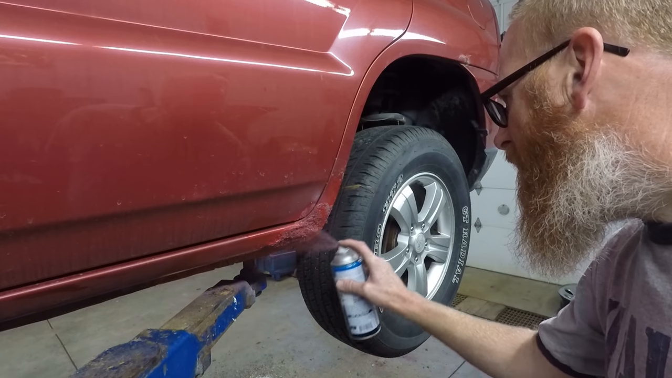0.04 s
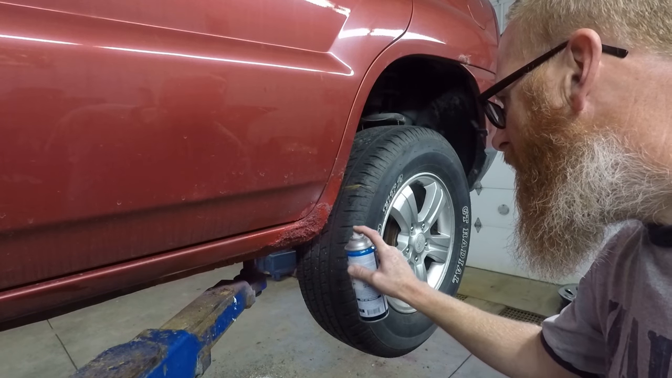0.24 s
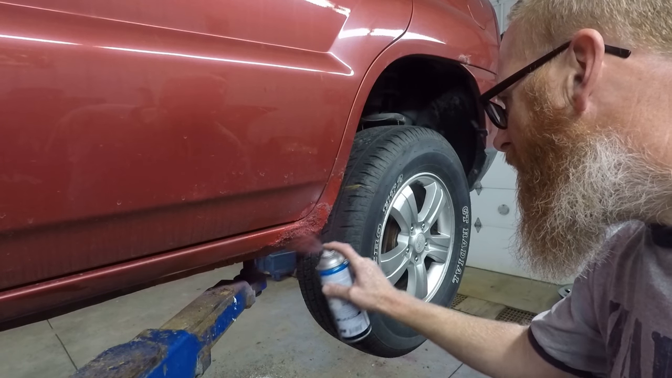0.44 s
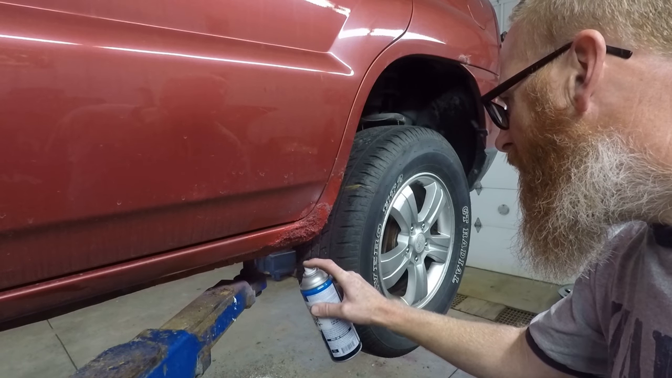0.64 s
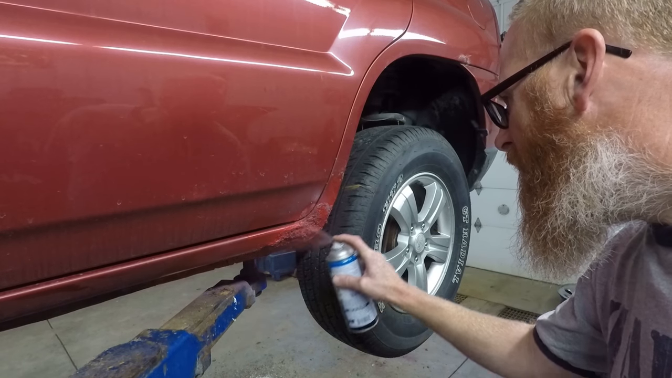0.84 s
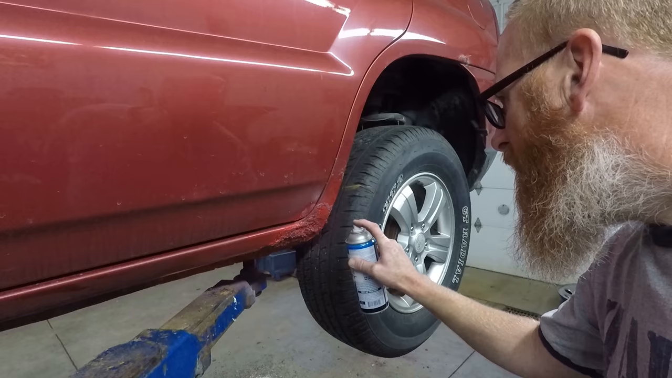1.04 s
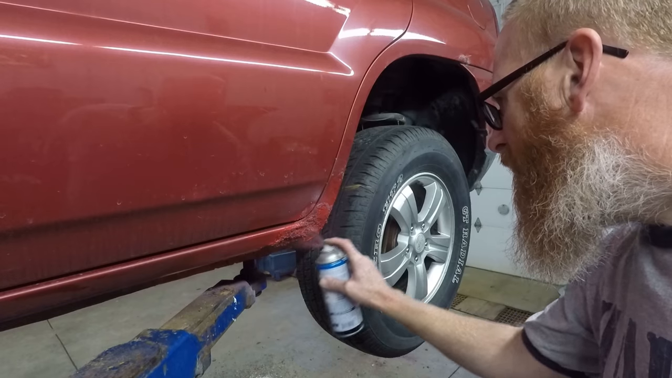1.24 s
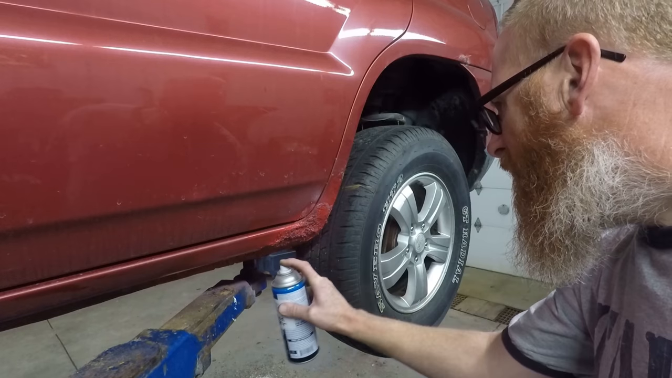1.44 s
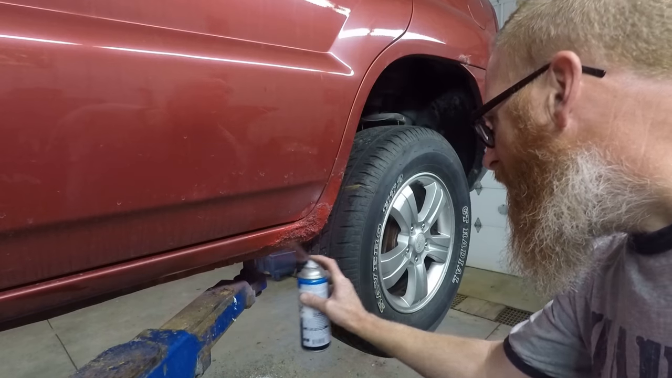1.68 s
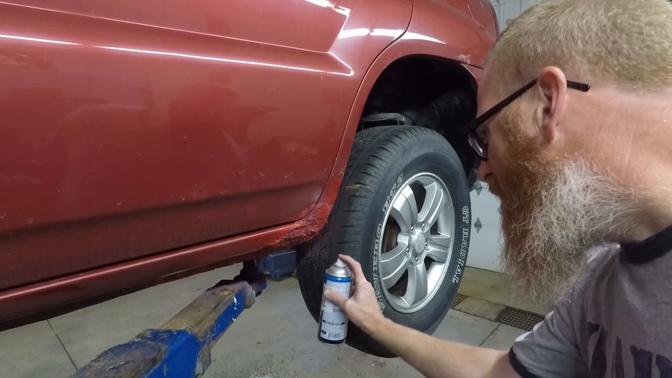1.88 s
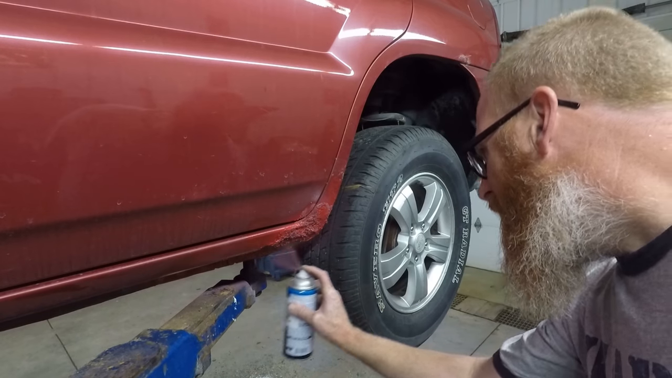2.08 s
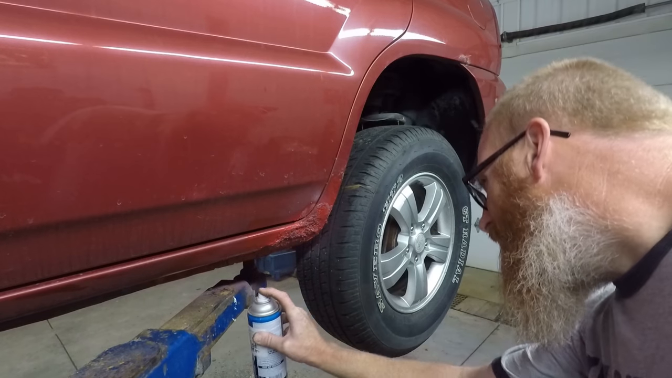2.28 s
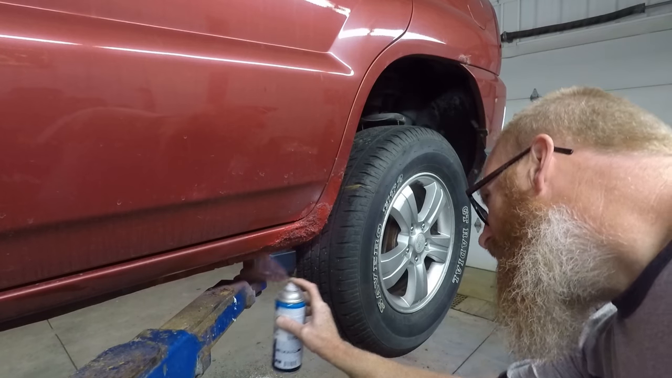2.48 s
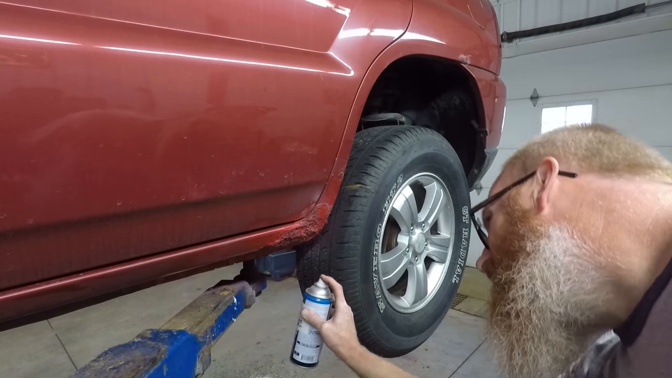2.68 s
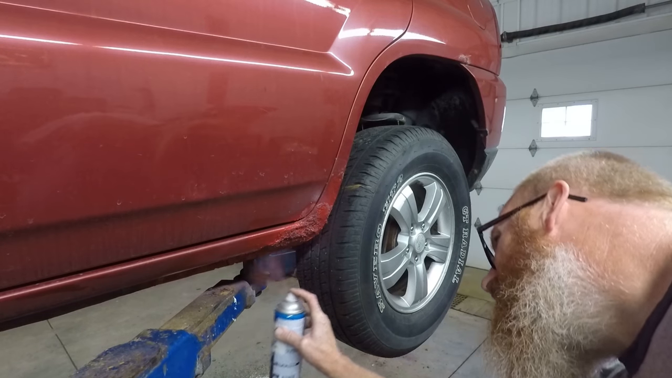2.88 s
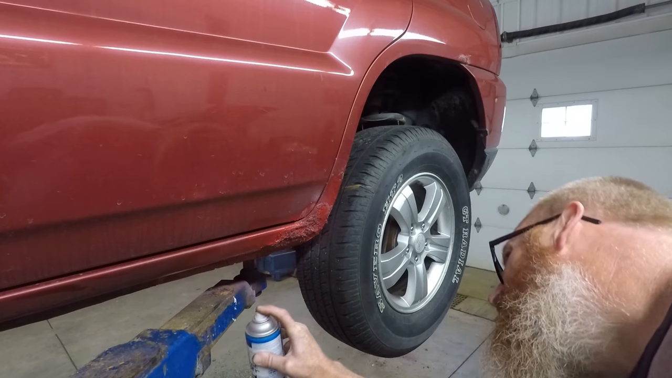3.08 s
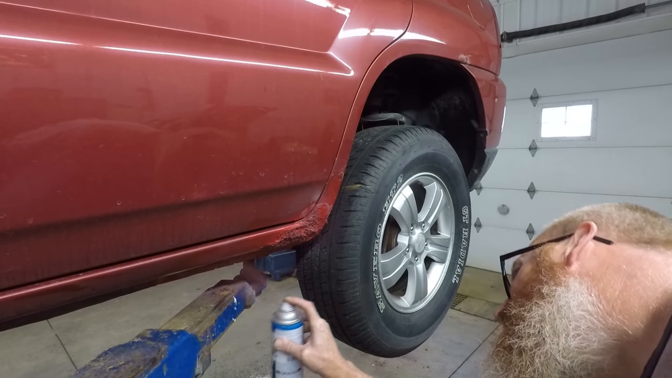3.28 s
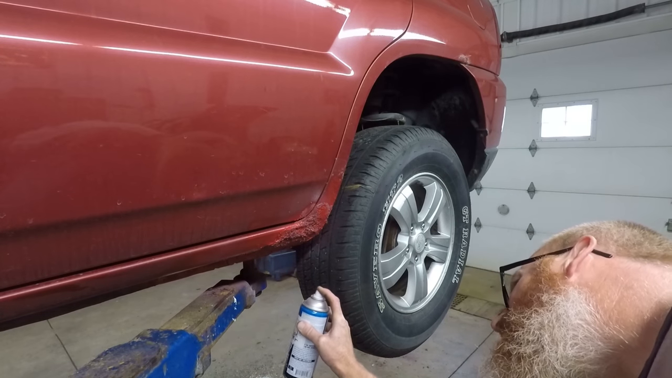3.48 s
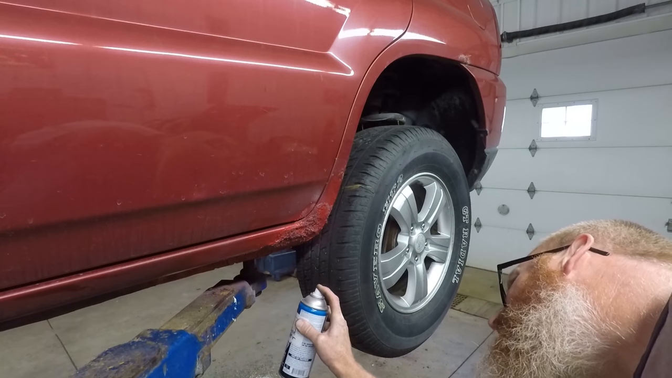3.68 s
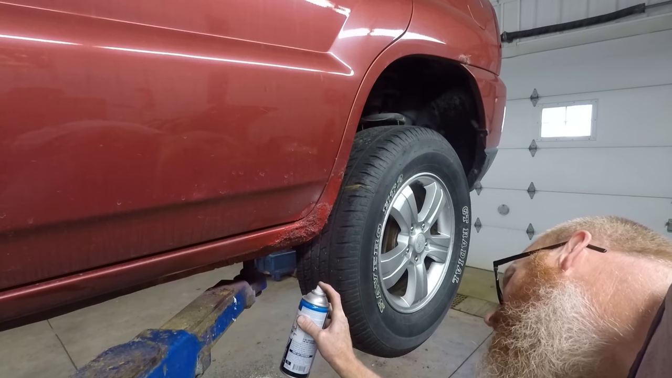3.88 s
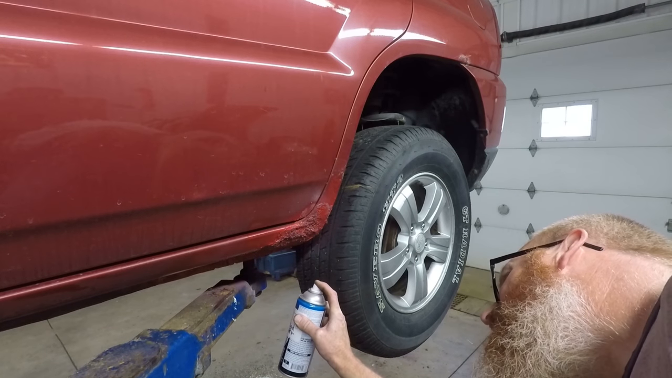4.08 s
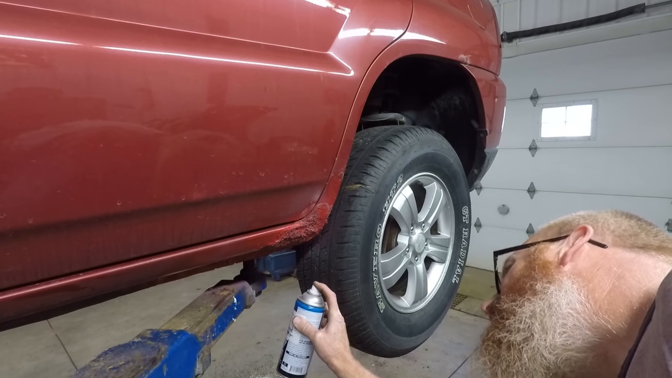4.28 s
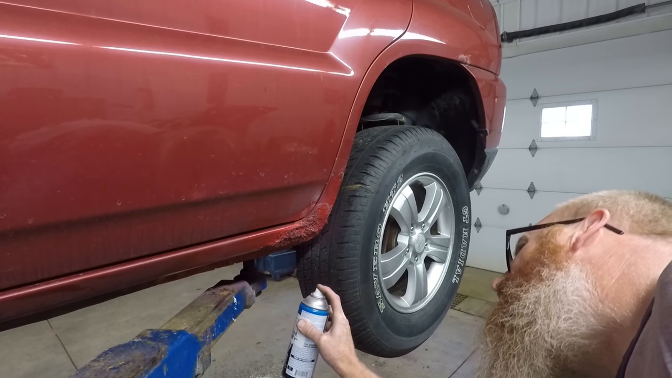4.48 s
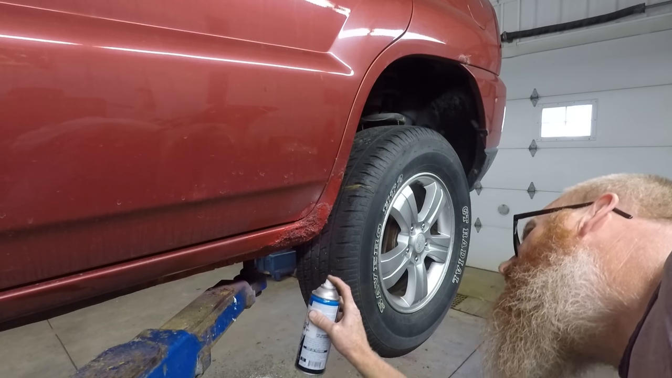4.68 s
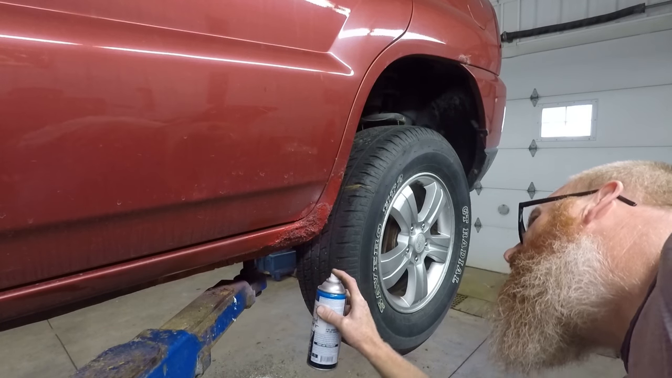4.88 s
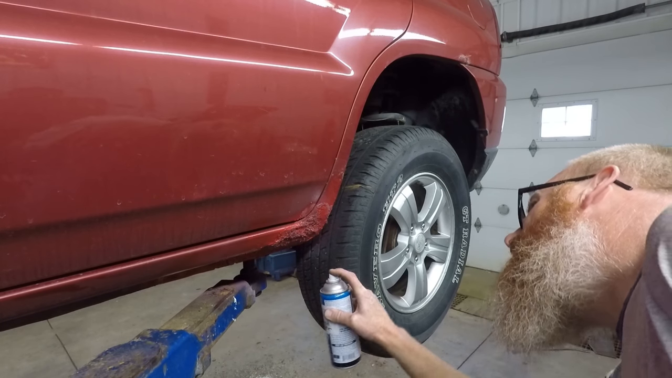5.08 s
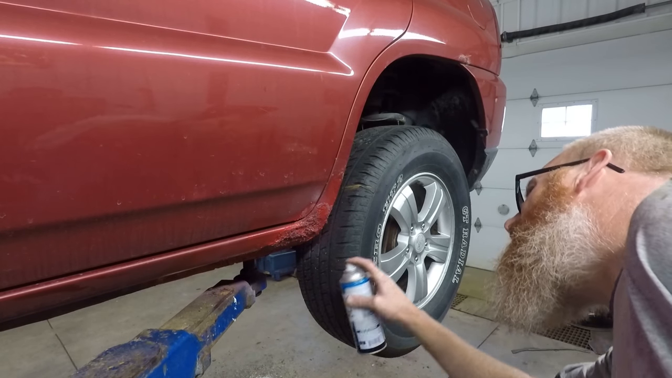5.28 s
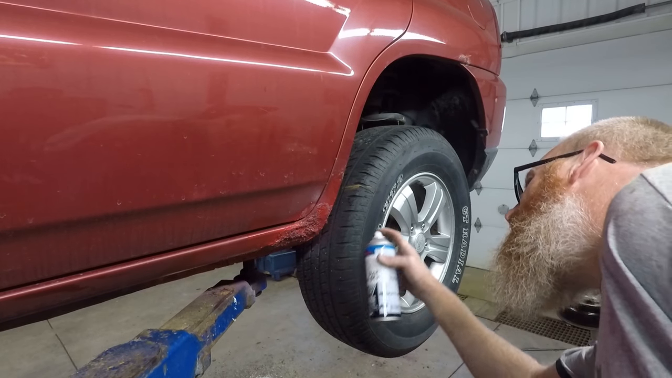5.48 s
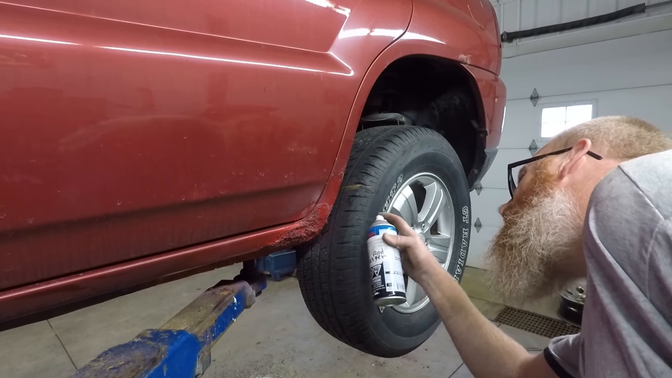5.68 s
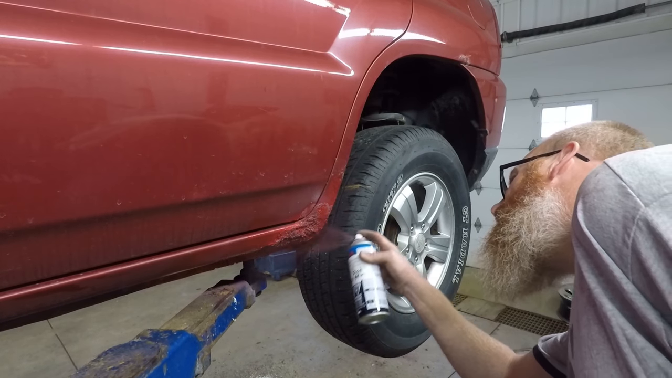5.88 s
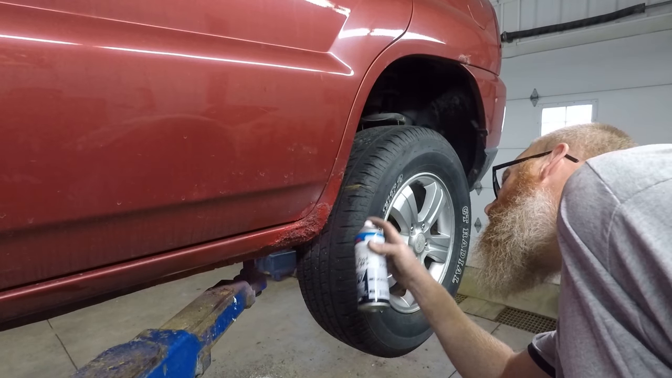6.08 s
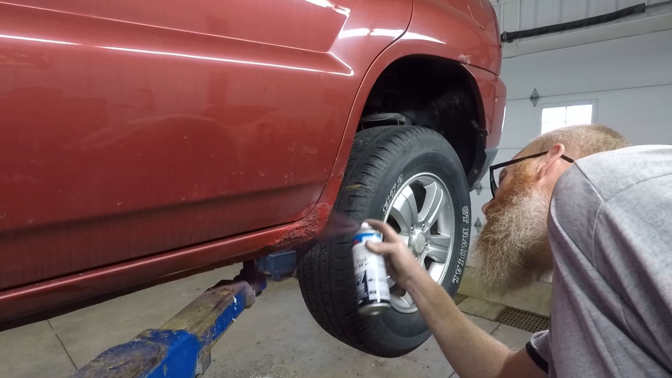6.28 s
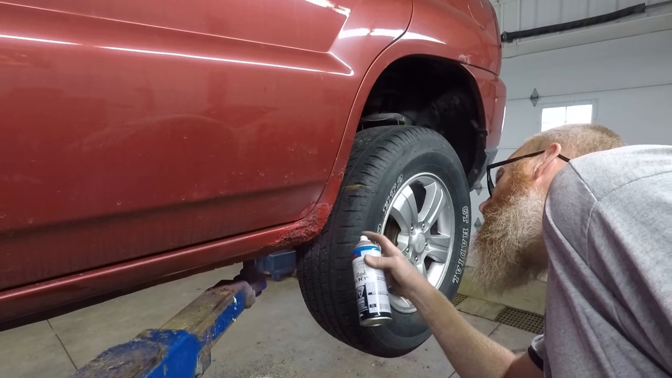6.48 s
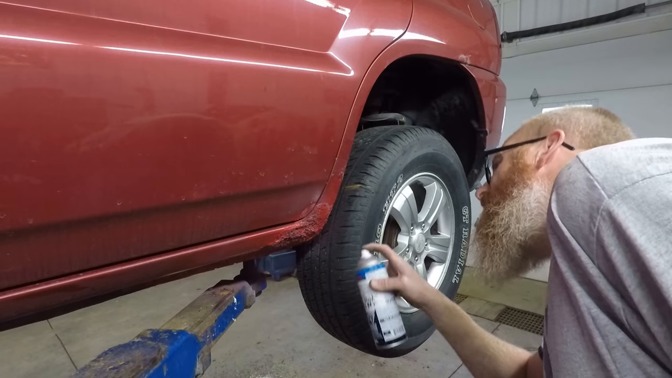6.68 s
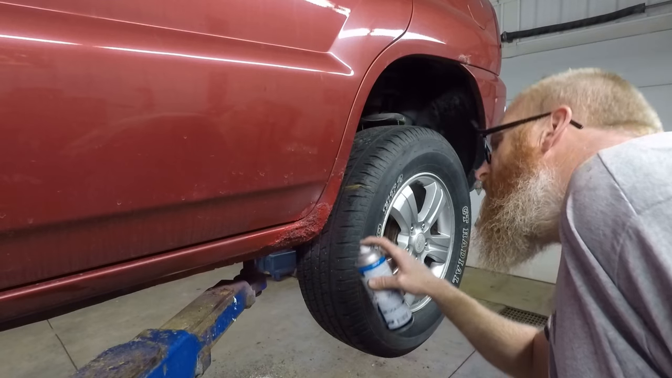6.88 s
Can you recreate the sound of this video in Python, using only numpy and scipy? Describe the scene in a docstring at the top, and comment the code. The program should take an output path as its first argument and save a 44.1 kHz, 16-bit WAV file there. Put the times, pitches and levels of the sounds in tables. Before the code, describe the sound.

Close to the microphone, a spray can gives nine crisp hissing bursts of about a fifth of a second each, nearly two and a half per second. Spraying stops for about two and a half seconds, leaving small dry ticks and a faint low drone, then two softer bursts follow and a few last clicks. The garage adds a short bright reverberation.

```python
"""An aerosol can sprays paint on a car's sill in eleven quick bursts, in a garage.
The jet is shaped turbulence noise, with spits from random pops as paint breaks up at the nozzle.
Delayed copies off the nearby panel and tyre comb the hiss, and the notches slide as the hand moves.
The can ticks between bursts and after the last: decaying noise through single resonances.
Far off an engine drones, a few harmonic orders slowly sinking in pitch over rumble and faint hiss."""
import sys
import numpy as np
from scipy import signal
from scipy.fft import rfft, irfft, next_fast_len
from scipy.io import wavfile
from scipy.ndimage import map_coordinates

SR = 44100
rng = np.random.default_rng(int(sys.argv[2]) if len(sys.argv) > 2 else 0)


def put_to_file(sound):
    """Save the sound as 16-bit audio at rate SR, in the file named by the first command-line argument."""
    columns = np.atleast_2d(sound).T  # one column per channel
    safe = np.clip(columns, -1, 1)
    whole_steps = np.round(safe * 32767)
    wavfile.write(sys.argv[1], SR, whole_steps.astype(np.int16))


N = 306054
T = np.arange(N) / SR  # s

# Levels in the tables are nominal, ahead of modulation and mixing gains.
# Garage background: [t/s, rumble level/dB, hiss level/dB]
BACKGROUND_LEVELS = [(0, -71, -70), (.66, -70.5, -68), (2.1, -64, -68.5), (2.9, -68, -69),
                     (3.9, -65, -71.5), (5.2, -70, -72.5), (6.94, -72, -70)]
# Spectral density of rumble and of hiss: [f/Hz, relative level/dB]
RUMBLE_SPECTRUM = [(15, -6), (28, 8.5), (45, 0), (80, 4.5), (130, 0), (190, -2.5), (250, -9.5),
                   (350, -10.5), (700, -24), (2000, -69)]
HISS_SPECTRUM = [(150, -55), (300, -8.5), (450, -6.5), (700, -6), (1250, -7), (1900, -10), (2900, -7.5),
                 (4200, -10), (5800, -15), (8300, -15.5), (10000, -11), (11500, -17), (13000, -18.5),
                 (15400, -20)]

# Far engine: [t/s, mean cycle rate f/Hz]
ENGINE_RATE = [(0, 13.15), (1, 12.7), (2, 12.25), (3, 11.85), (4, 11.62), (5, 11.48), (6.94, 11.38)]
# Orders (multiples of the cycle rate) that fade in and out: [t/s, level/dB]
FIFTH_ORDER_LEVEL = [(0, -59.5), (.7, -57.5), (1.9, -58), (2.14, -71), (2.35, -61.5), (3.05, -53.5),
                     (3.25, -59.5), (4.35, -64), (4.8, -53.5), (5.3, -67.5), (5.85, -63), (6.05, -57.5),
                     (6.94, -60)]
EIGHTH_ORDER_LEVEL = [(0, -72), (.8, -77), (1.78, -50.5), (2.1, -65.5), (2.4, -56), (3.95, -66),
                      (4.12, -54), (4.4, -53), (5.3, -64), (5.9, -67.5), (6.25, -57), (6.94, -53)]
ELEVENTH_ORDER_LEVEL = [(0, -80), (1.5, -80), (2, -64.5), (3.5, -62), (4.85, -77), (5.5, -62.5),
                        (6.1, -74.5), (6.94, -72)]
# The 15th and 17th orders swell once: dB, dB, s, s
UPPER_DB, UPPER_SWELL_DB, UPPER_AT_S, UPPER_WIDTH_S = -84, 13, 1.92, 1.1

# Decay of the garage's reverberation: [f/Hz, t60/s]
ROOM_DECAY = [(200, 0.87), (800, 0.26), (2050, 0.64), (2320, 0.91), (2600, 0.74), (4500, 0.71),
              (9000, 0.44), (15000, 0.4)]
# Colour of that reverberation: [f/Hz, relative level/dB]
ROOM_SPECTRUM = [(200, -16.5), (1000, 7), (2050, -0.5), (2320, -9), (2600, -2), (3600, -0.5), (4600, 4),
                 (7000, 2.5), (10000, 2), (12500, -6.5), (15000, -9)]
# How open the can is to the room: [t/s, level/dB]
ROOM_SEND = [(0, -3), (1.4, -3), (2.2, -4), (3.4, -2), (5.8, -1), (6.4, 0)]

# Ticks of the can and creaks of its nozzle:
# [t/s, peak level/dB, f/Hz, width of each resonator pass/Hz, t60 of the exciting noise/s]
CAN_TICKS = [(1.983, -45.5, 4700, 5000, .05), (2.334, -48, 4500, 5000, .05),
             (2.716, -41.5, 3500, 9000, .035), (2.718, -56.5, 1490, 200, .15), (3.189, -54, 3200, 300, .09),
             (4.372, -45, 10000, 6000, .005), (4.466, -41.5, 10000, 11000, 0.0037),
             (4.662, -45, 10400, 5000, .007), (5.311, -42, 10000, 9000, .005),
             (6.570, -38.5, 3400, 4500, 0.017), (6.719, -47, 4300, 3500, .035),
             (6.797, -49, 3400, 2500, .025)]

# The jet catches an edge or hollow of the sill and puffs:
# [t/s at the centre, level/dB, f/Hz, Gaussian half length/s]
SILL_PUFFS = [(2.781, -47.5, 550, .0052), (5.779, -51, 420, .011), (5.927, -55, 1190, 0.0048)]

# The hand's stroke in each burst moves the echoes off panel and tyre:
# [panel delay/ms at opening, at shutting, tyre delay/ms at opening, at shutting, strength 0-1]
HAND_STROKES = [ (.396, .352, .576, .488, .44), (.316, .376, .532, .652, .42), (.38, .3, .488, .38, .4),
                (.272, .272, .476, .604, .42), (.22, .22, .516, .368, .36), (.18, .228, .684, .772, .27),
                (.22, .204, .496, .388, .38), (.22, .24, .692, .82, .22), (.368, .3, .644, .576, .24),
                (.3, .184, .692, .656, .26), (.284, .188, .68, .532, .36), ]

# One row per press of the nozzle: [opening t/s, shutting t/s, jet level/dB, sag over the burst/dB,
# fizz level/dB re jet, hollow resonance level/dB re jet, rush of air level/dB, opening surge/dB]
NOZZLE_BURSTS = [ (0.0, 0.192, -43, 1, 1, -10, -55.5, 0), (0.356, 0.594, -43, -0.5, 3.5, -5, -55, 4),
                 (.781, 1.014, -43, -0.5, 1.8, -9.5, -54.5, 1.5),
                 (1.171, 1.427, -44.5, -2, 4.5, -5, -56.5, 5), (1.616, 1.837, -43.5, 3, 1, -4, -55.5, 3.5),
                 (2.019, 2.232, -44.5, -1, 1.5, -4.5, -56, 3.5), (2.398, 2.592, -45, 2, 2, -1.5, -57, 3.5),
                 (2.757, 3.071, -45, -1, 3, -3, -57.5, 4), (3.213, 3.442, -45, 2.5, 2, -5.5, -56.5, 3),
                 (5.724, 5.933, -46, 3, 4, -6, -55, -0.5), (6.215, 6.402, -47, 3, 4, -8.5, -57, 3.5), ]
# Spectral density of each layer of the spray: [f/Hz, relative level/dB]
JET_SPECTRUM = [(1500, -24), (2300, -1.5), (2650, -8), (3000, -3), (3700, 0.5), (4400, 0.6), (5100, -3),
                (6000, -8.5), (7000, -16.5), (9000, -12), (14000, -50)]
FIZZ_SPECTRUM = [(4500, -30), (6500, -3), (7300, -4), (7900, -1.5), (8500, -4), (9400, -2.5), (10200, 2),
                 (11300, 2.5), (12100, 0.5), (13000, -4.5), (13800, -4), (14600, -0.5), (15500, -11)]
HOLLOW_SPECTRUM = [(1100, -29.5), (1600, -17), (1900, -5.5), (2150, -2), (2330, 4), (2520, -4),
                   (3000, -6.5), (4500, -59)]
AIR_SPECTRUM = [(60, -28), (150, -6.5), (300, -4), (450, 3.5), (650, 2.5), (880, 3), (1250, 1), (1700, 3.5),
                (2500, -15), (5000, -32)]

# Just after the valve opens the pressure surges; as the finger lifts, the jet is throttled.
SURGE_AT_S, SURGE_WIDTH_S, THROTTLE_S, THROTTLE_DB = 0.012, 0.016, 0.013, 4
FIZZ_SURGE, HOLLOW_SURGE, AIR_SURGE = 0.54, 2, 1.8  # how strongly each layer follows the surge
HOLLOW_SPLUTTER_DB, AIR_SPLUTTER_DB = 4.5, 3  # the half-shut valve splutters: the low layers rise

TOP_HZ = 15350  # upper band limit


def amp(db):
    """Logarithmic level: converts decibels to a pressure ratio."""
    return np.exp(np.asarray(db) * (np.log(10) / 20))


def unit(x):
    """Normalisation: scales x to rms 1."""
    return x / np.sqrt(np.mean(x ** 2) + 1e-20)


def along(points, hz):
    """Logarithmic frequency scale: interpolates (f/Hz, value) points."""
    f, v = np.transpose(points)
    return np.interp(np.log(hz + 1), np.log(f + 1), v)


def curves(rows):
    """Linear interpolation in time: one curve for each column after t/s."""
    s, *cols = np.transpose(rows)
    return [np.interp(T, s, c) for c in cols]


def wobble(rate):
    """Slow random modulation: a smooth curve through `rate` random knots a second."""
    knots = rng.standard_normal(int(N * rate / SR) + 4)
    steps = np.arange(0, len(knots) - 1, 1 / 16)
    smooth = map_coordinates(knots, [steps])  # cubic spline
    return np.interp(T * rate, steps, smooth)


def noise():
    """White noise: equal mean power at every frequency."""
    return rng.standard_normal(N)


def filtered(x, response):
    """Linear filtering: multiplies the spectrum of x by a function of frequency."""
    m = next_fast_len(N + SR // 2)
    hz = np.fft.rfftfreq(m, 1 / SR)
    return irfft(rfft(x, m) * response(hz), m)[:N]


def coloured(x, spectrum):
    """Spectral shaping: weights x by a tabulated spectrum, at rms 1."""
    return unit(filtered(x, lambda hz: amp(along(spectrum, hz))))


def resonance(x, hz, width_hz):
    """Resonance: two passes through one resonator steepen its skirts."""
    centre_hz = min(hz, SR / 2.2)
    quality = hz / min(width_hz, SR / 4)
    b, a = signal.iirpeak(centre_hz, quality, SR)
    once = signal.lfilter(b, a, x)
    return signal.lfilter(b, a, once)


def delayed(fine, ms):
    """Propagation delay: reads a twice-oversampled sound over a path of changing length."""
    return np.interp(2 * SR * (T - ms / 10 ** 3), np.arange(len(fine)), fine)


def background_hiss():
    """Stationary noise under a slow level curve: the garage's faint hiss."""
    level_db = curves(BACKGROUND_LEVELS)[1] + 5.5
    return amp(level_db) * coloured(noise(), HISS_SPECTRUM)


def engine_order(k, turns):
    """Harmonic order: a slightly unsteady sinusoid at k times the cycle rate, at rms 1."""
    phase = 2 * np.pi * (k * turns + rng.random()) + .2 * wobble(8)
    return np.sqrt(2) * np.sin(phase)


def engine():
    """Periodic source: a far engine comes through the walls as a few low orders over a rumble."""
    rate_hz = curves(ENGINE_RATE)[0] * (1 + .004 * wobble(7))
    turns = np.cumsum(rate_hz) / SR
    strong = np.zeros(N)
    levels = {5: FIFTH_ORDER_LEVEL, 8: EIGHTH_ORDER_LEVEL, 11: ELEVENTH_ORDER_LEVEL}
    for k, rows in levels.items():
        level_db = curves(rows)[0] - 1 + 1.2 * wobble(9)
        strong += amp(level_db) * engine_order(k, turns)
    upper = sum(amp(2.5 * wobble(4)) * engine_order(k, turns) for k in (15, 17))
    upper_db = UPPER_DB + UPPER_SWELL_DB * np.exp(-((T - UPPER_AT_S) / UPPER_WIDTH_S) ** 2)
    rumble_db = curves(BACKGROUND_LEVELS)[0] + 5.0
    rumble = amp(rumble_db) * coloured(noise(), RUMBLE_SPECTRUM)
    return strong + amp(upper_db) * upper + rumble


def room_tail(build):
    """Reverberant decay: noise builds up over `build` s, then each band dies at its own rate."""
    hz, t, z = signal.stft(rng.standard_normal(SR), SR, nperseg=512)
    decay = 1000 ** (-t / along(ROOM_DECAY, hz)[:, None])
    colour = amp(along(ROOM_SPECTRUM, hz))[:, None]
    tail = signal.istft(z * decay * colour, SR, nperseg=512)[1]
    tail *= 1 - np.exp(-np.arange(len(tail)) / SR / build)
    return tail / np.linalg.norm(tail)


def garage(x, tail_db, build):
    """Reverberation by convolution: each new place of the can rings the room differently."""
    out = np.zeros(N + 2 * SR)
    # a new place begins 50 ms ahead of each burst
    cuts = [0] + [int(burst[0] * SR) - SR // 20 for burst in NOZZLE_BURSTS[1:]] + [N]
    for start, stop in zip(cuts, cuts[1:]):
        wet = signal.fftconvolve(x[start:stop], room_tail(build))
        out[start:start + len(wet)] += wet
    return amp(tail_db) * out[:N]


def ticks():
    """Impulsive excitation: each small contact is a dying burst in one resonance of can or cap."""
    out, t = np.zeros(N + SR), np.arange(SR // 8) / SR
    for s, db, hz, width_hz, t60 in CAN_TICKS:
        excitation = rng.standard_normal(len(t)) * 1000 ** (-t / t60)
        tick = resonance(excitation, hz, width_hz)
        out[round(s * SR):][:len(t)] += amp(db) * tick / np.abs(tick).max()
    return out[:N]


def sweep():
    """Uniform motion in each burst: panel delay/ms, tyre delay/ms and echo strength."""
    points = []
    for burst, stroke in zip(NOZZLE_BURSTS, HAND_STROKES):
        start, stop = burst[:2]
        panel_from, panel_to, tyre_from, tyre_to, strength = stroke
        points.append((start, panel_from, tyre_from, strength))
        points.append((stop, panel_to, tyre_to, strength))
    return curves(points)


def bounces(x, level_db, count=7):
    """Scattering: small parts of lift arm and wheel return only treble, as the hand sweeps and trembles."""
    high_pass = signal.butter(2, 2500, "high", fs=SR, output="sos")
    treble = signal.sosfilt(high_pass, x)
    fine = signal.resample_poly(treble, 2, 1)
    sweep_ms = 2.5 * sweep()[0]
    lags_ms = np.linspace(.8, 2, count) * rng.uniform(.92, 1.08, count)
    scattered = np.zeros(N)
    for lag in lags_ms:
        path_ms = lag + rng.uniform(-.4, 1) * sweep_ms + .07 * wobble(13)
        scattered += rng.choice([-1, 1]) * delayed(fine, path_ms)
    return amp(level_db) * scattered / np.sqrt(count)


def panel(x):
    """Comb filtering: echoes off panel, tyre and both in turn cut notches that slide with the can."""
    panel_ms, tyre_ms, strength = sweep()
    fine = signal.resample_poly(x, 2, 1)
    echoes = 1.3 * delayed(fine, panel_ms)
    echoes += .75 * delayed(fine, tyre_ms)
    echoes += .65 * delayed(fine, panel_ms + tyre_ms)
    return x + strength * echoes


def puffs():
    """Edge and cavity excitation: brief Gaussian swells of low, narrow noise."""
    out, t = np.zeros(N), np.arange(-SR // 20, SR // 20) / SR
    for s, db, hz, half in SILL_PUFFS:
        narrow = unit(resonance(rng.standard_normal(len(t)), hz, 0.55 * hz))
        swell = np.exp(-(t / half) ** 2 / 2) * narrow
        out[round((s + t[0]) * SR):][:len(t)] += amp(db) * swell
    return out


def droplets(rate, spread_db):
    """Random impulses: tiny pops of clipped log-normal size as paint breaks up at the nozzle."""
    occurs = rng.random(N) < rate / SR
    polarity = np.sign(noise())
    size = amp(spread_db * np.clip(noise(), -2, 1))
    return unit(occurs * polarity * size)


def smooth_step(t, s, width):
    """Gradual switching: a tanh rise from 0 to 1 about time s."""
    return .5 + .5 * np.tanh((t - s) / width)


def valve(rise, fall, lead, leak_db):
    """Flow through an orifice: a little gas leaks first, then the valve snaps open, and shuts."""
    flow = np.zeros(N)
    for i, (start, stop, *_) in enumerate(NOZZLE_BURSTS):
        span = slice(max(0, int(start * SR) - SR // 10), int(stop * SR) + SR // 10)
        t = T[span]
        opened = smooth_step(t, start, rise)
        leak = amp(leak_db) * smooth_step(t, start - lead, rise / 2) * (1 - opened)
        opening = 1 if i == 0 else opened + leak  # the first burst is already under way
        flow[span] += opening * (1 - smooth_step(t, stop, fall))
    return flow


def presses():
    """Burst timing: s since opening, s until shutting, progress 0-1, then the burst's other columns."""
    rows = np.array(NOZZLE_BURSTS)
    midgaps = (rows[1:, 0] + rows[:-1, 1]) / 2
    nearest = np.searchsorted(midgaps, T)
    start, stop, *cols = rows[nearest].T
    progress = np.clip((T - start) / (stop - start), 0, 1)
    return T - start, stop - T, progress, *cols


def pressure():
    """Driving pressure: levels/dB of jet, fizz, hollow and air as a burst surges, drifts and shuts."""
    since, until, progress, db, sag_db, fizz_db, hollow_db, air_db, surge_db = presses()
    held = db - sag_db * (progress - .5)  # a negative sag rises
    surge = surge_db * np.exp(-((since - SURGE_AT_S) / SURGE_WIDTH_S) ** 2)
    shutting = np.exp(-np.maximum(until, 0) / THROTTLE_S)
    return (held + surge - THROTTLE_DB * shutting,
            held + fizz_db + FIZZ_SURGE * surge - THROTTLE_DB * shutting,
            held + hollow_db + HOLLOW_SURGE * surge + HOLLOW_SPLUTTER_DB * shutting,
            air_db + AIR_SURGE * surge + AIR_SPLUTTER_DB * shutting)


def spray():
    """Jet turbulence: broadband jet, fizz of atomised paint, hollow resonance and rush of air."""
    jet_db, fizz_db, hollow_db, air_db = pressure()
    spits = droplets(rate=600, spread_db=3.5)
    # jet, fizz and hollow share one sputter, in dB; the air has its own
    sputter = 0.55 * wobble(45) + 0.9 * wobble(330)
    jet = amp(jet_db + sputter) * coloured(noise() + .3 * spits, JET_SPECTRUM)
    fizz = amp(fizz_db + sputter) * coloured(noise() + .3 * spits, FIZZ_SPECTRUM)
    hollow = amp(hollow_db + sputter) * coloured(noise() + .4 * spits, HOLLOW_SPECTRUM)
    air = amp(air_db + 2.0 * wobble(60)) * coloured(noise() + .3 * spits, AIR_SPECTRUM)
    main_flow = valve(rise=0.007, fall=0.0035, lead=0.016, leak_db=-17)
    fizz_flow = valve(rise=0.0027, fall=0.015, lead=0.012, leak_db=-11.5)
    return (jet + hollow + air) * main_flow + fizz * fizz_flow


def scene():
    """Superposition: near can, its reverberation, drone and faint hiss, alike in both channels."""
    hiss, clicks = spray() + puffs(), ticks()
    early = bounces(hiss, level_db=-6)
    near = amp(-2.5) * (panel(hiss) + early) + amp(-3.0) * clicks
    # held back from the sill, the can sends more of its sound into the room
    openness = amp(curves(ROOM_SEND)[0])
    room = garage(openness * (hiss + clicks), tail_db=-8.5, build=0.0011)
    mono = near + room + engine() + background_hiss()
    return np.array([mono, mono])


def record(dry):
    """Band limitation: nothing from TOP_HZ upward is kept."""
    return np.array([filtered(x, lambda hz: hz < TOP_HZ) for x in dry])


dry = scene()
out = record(dry)
put_to_file(out)
```